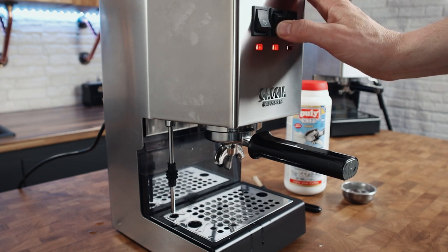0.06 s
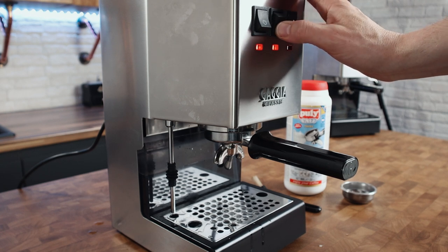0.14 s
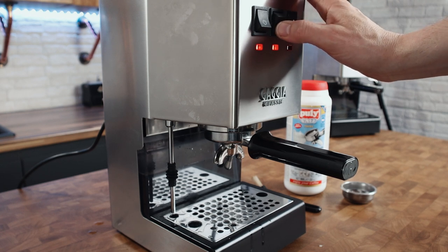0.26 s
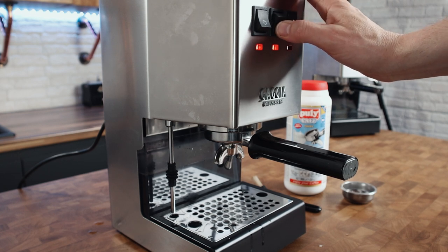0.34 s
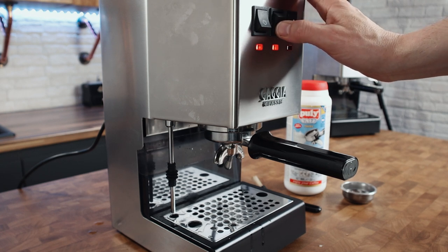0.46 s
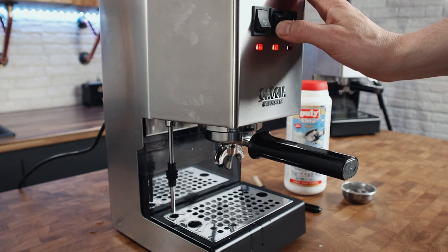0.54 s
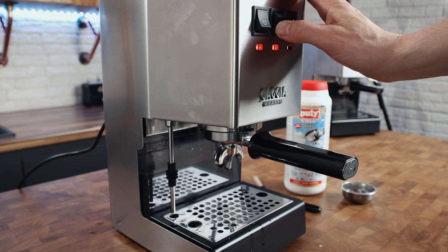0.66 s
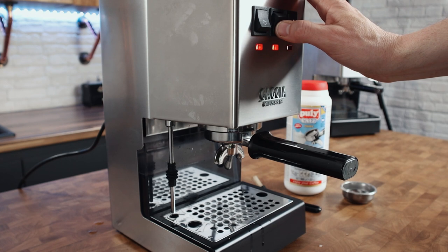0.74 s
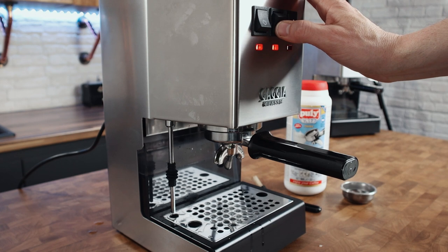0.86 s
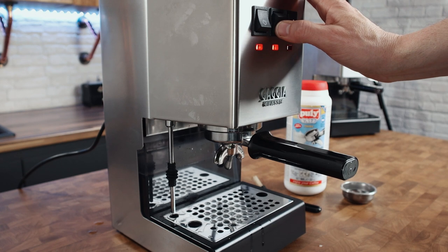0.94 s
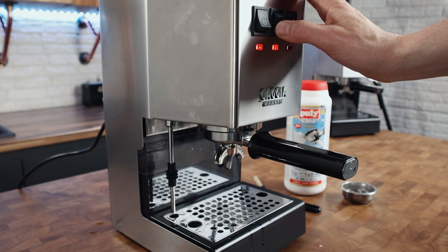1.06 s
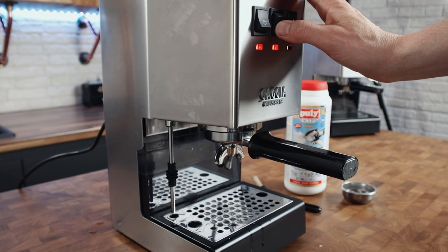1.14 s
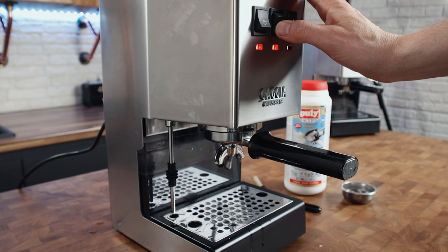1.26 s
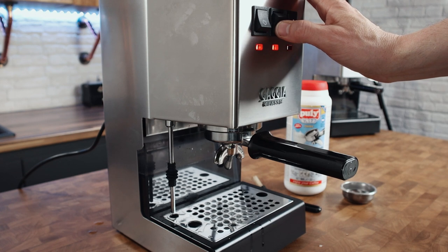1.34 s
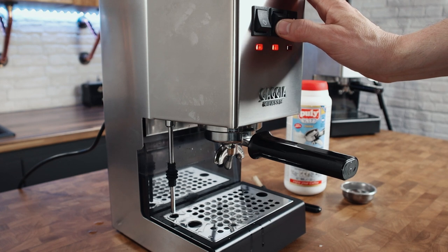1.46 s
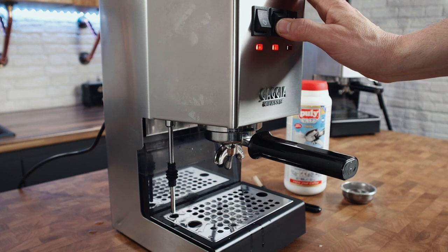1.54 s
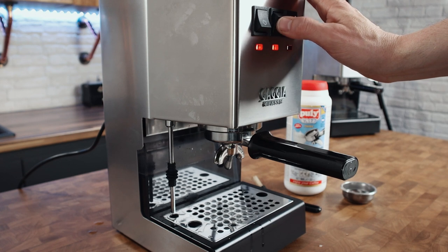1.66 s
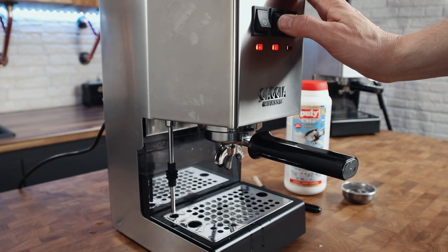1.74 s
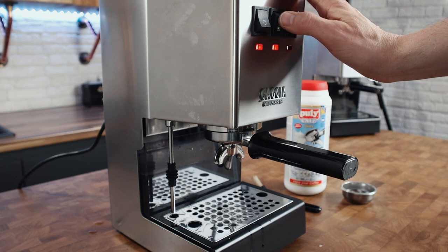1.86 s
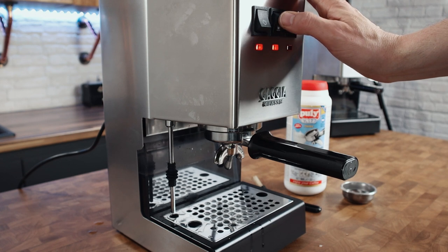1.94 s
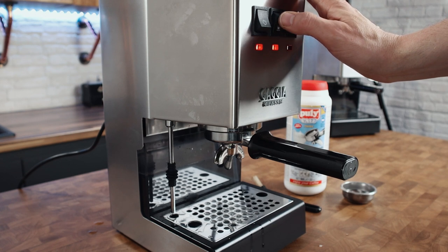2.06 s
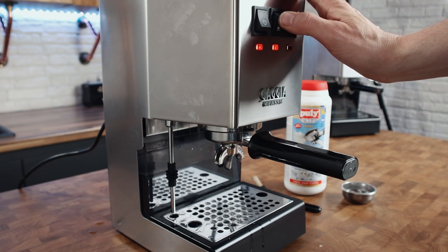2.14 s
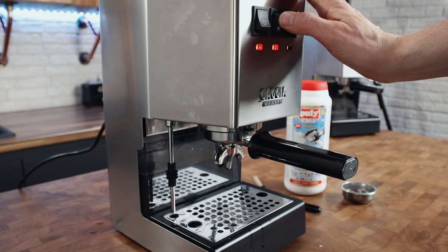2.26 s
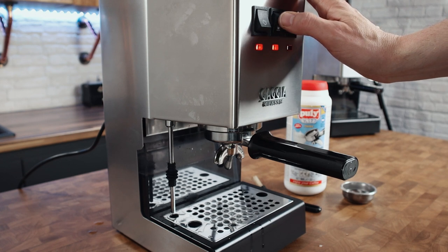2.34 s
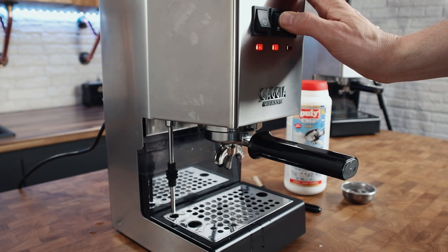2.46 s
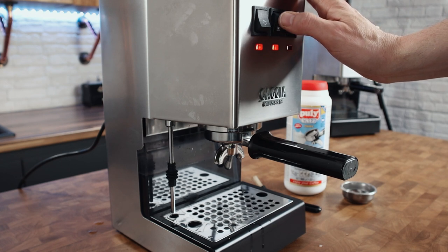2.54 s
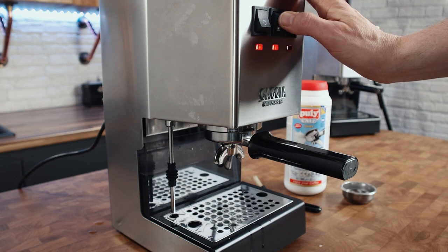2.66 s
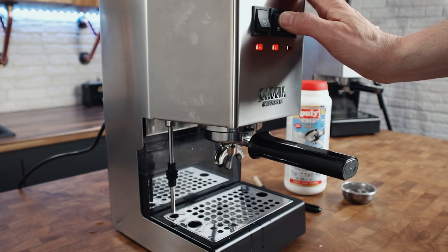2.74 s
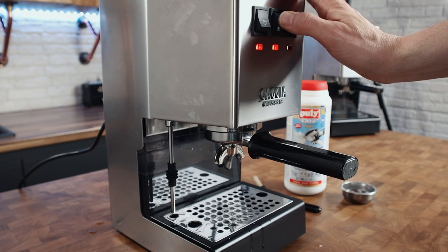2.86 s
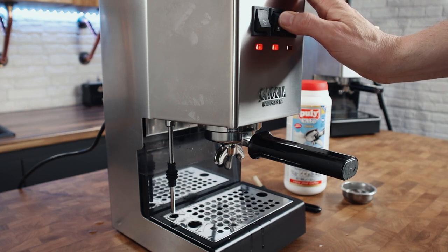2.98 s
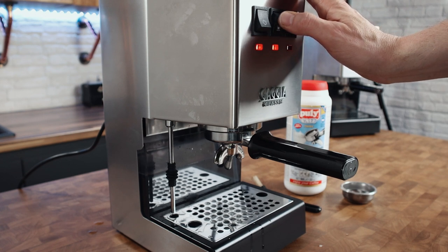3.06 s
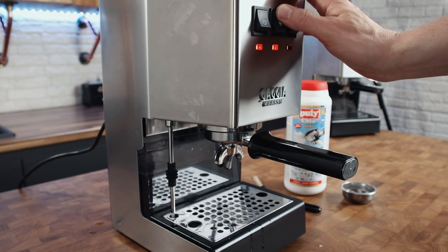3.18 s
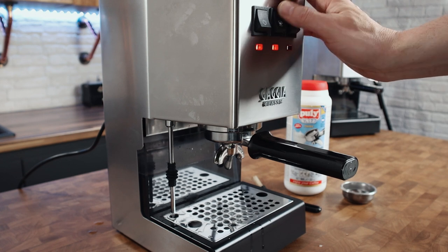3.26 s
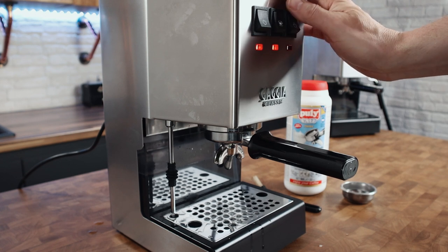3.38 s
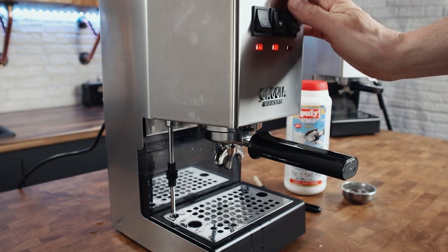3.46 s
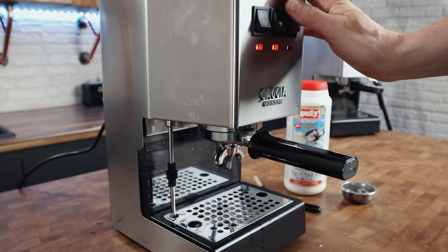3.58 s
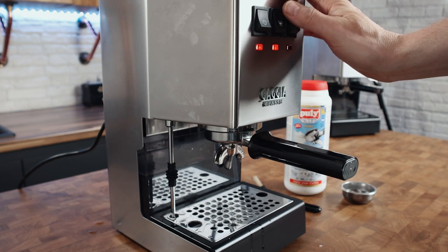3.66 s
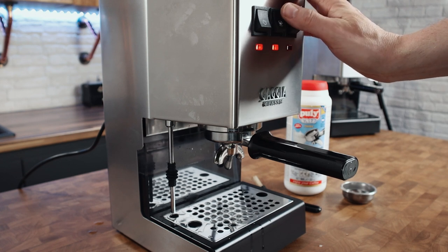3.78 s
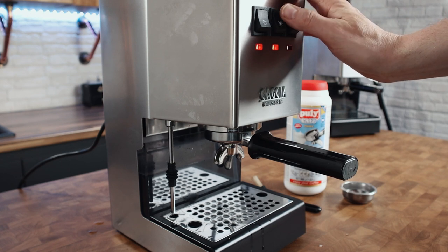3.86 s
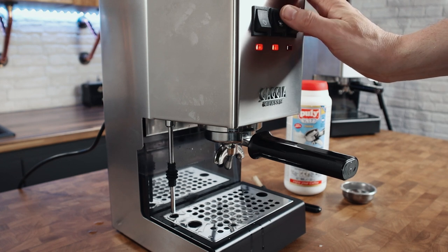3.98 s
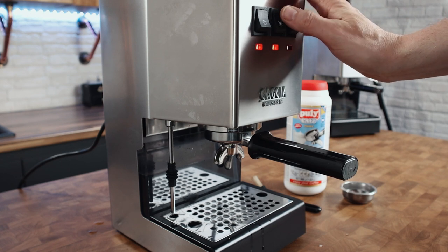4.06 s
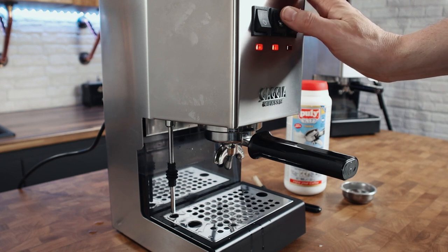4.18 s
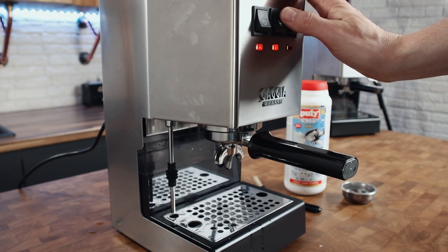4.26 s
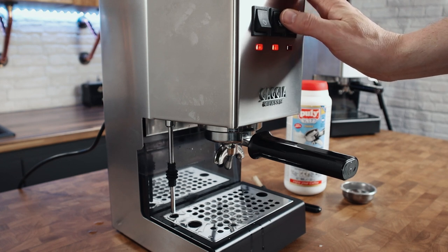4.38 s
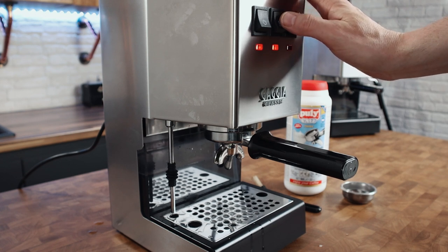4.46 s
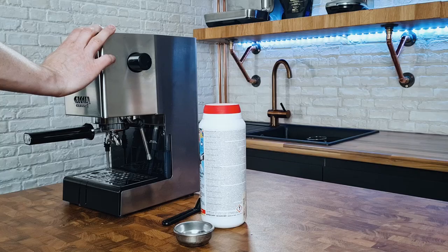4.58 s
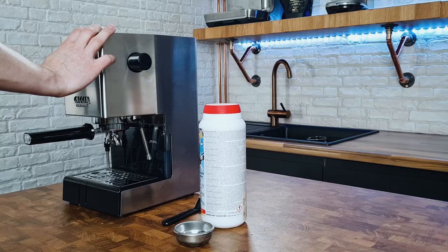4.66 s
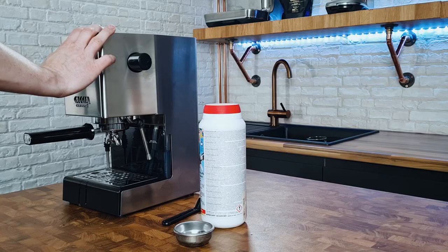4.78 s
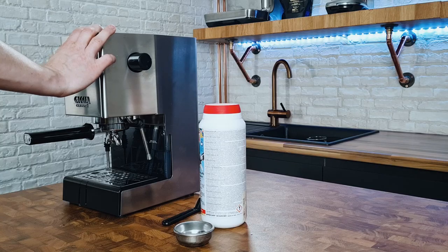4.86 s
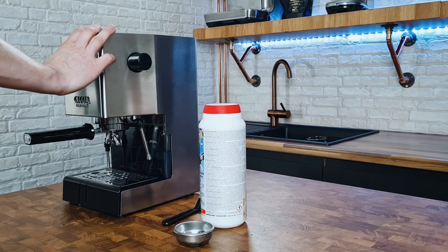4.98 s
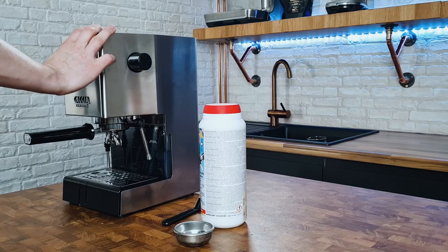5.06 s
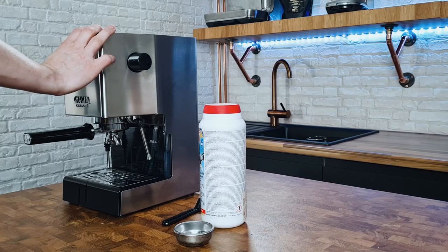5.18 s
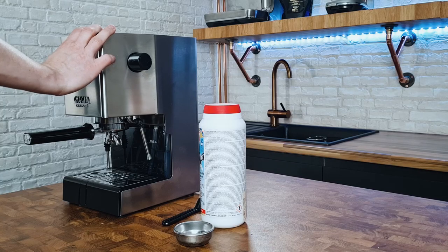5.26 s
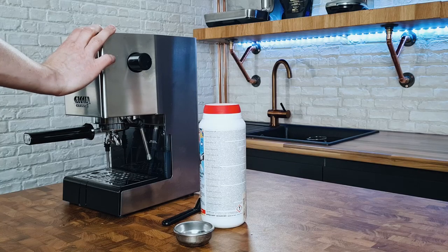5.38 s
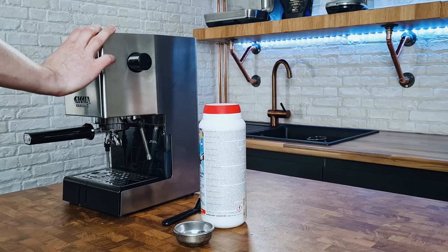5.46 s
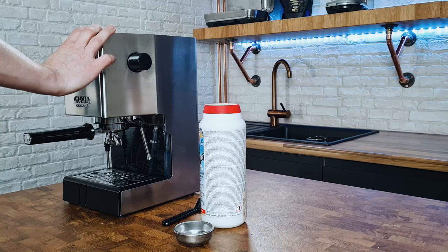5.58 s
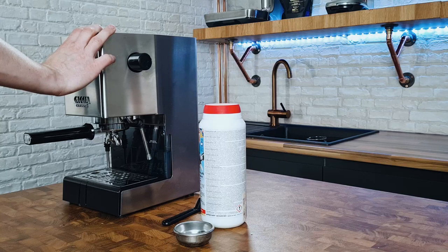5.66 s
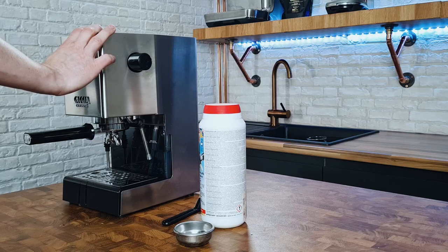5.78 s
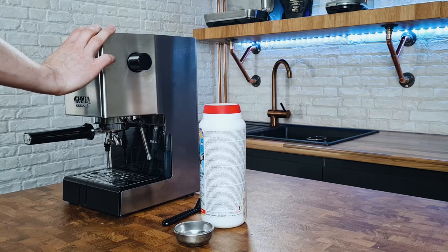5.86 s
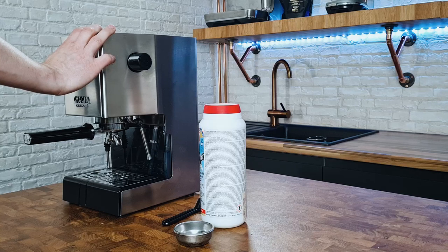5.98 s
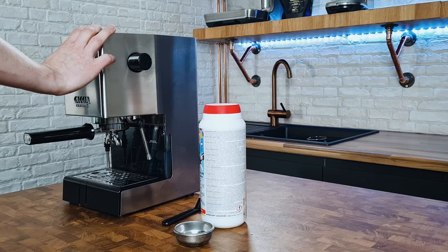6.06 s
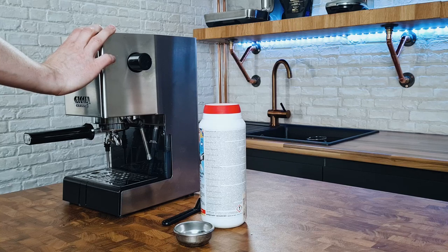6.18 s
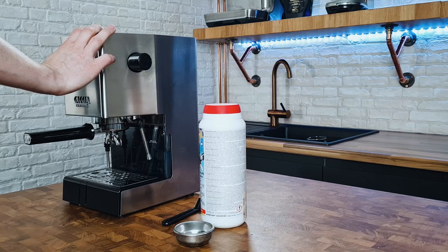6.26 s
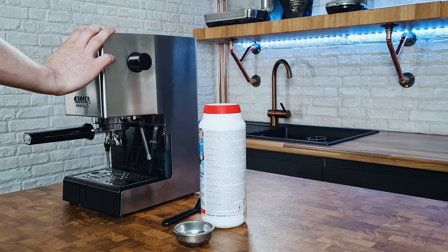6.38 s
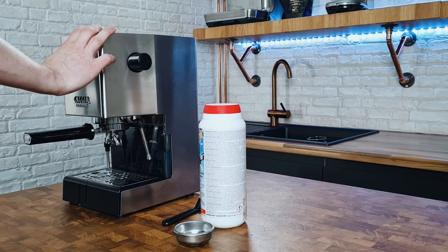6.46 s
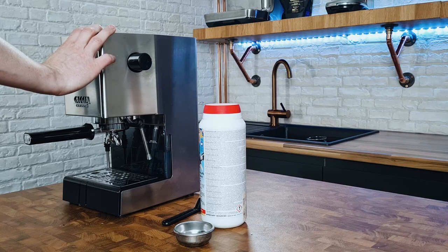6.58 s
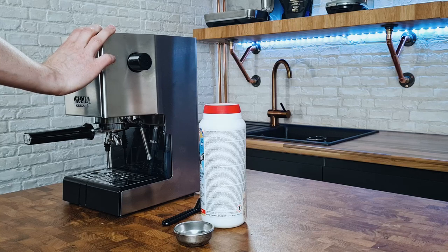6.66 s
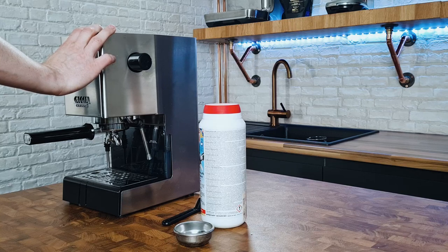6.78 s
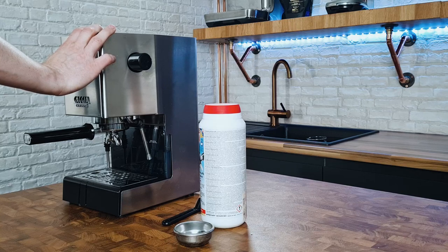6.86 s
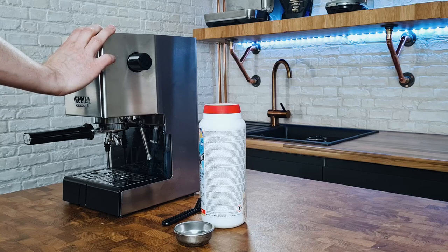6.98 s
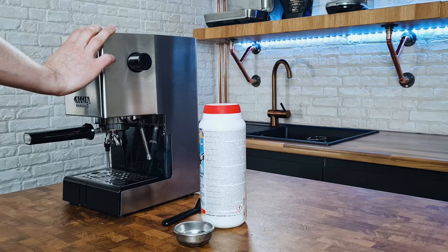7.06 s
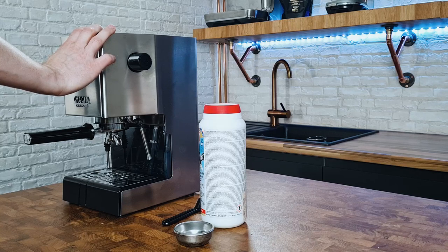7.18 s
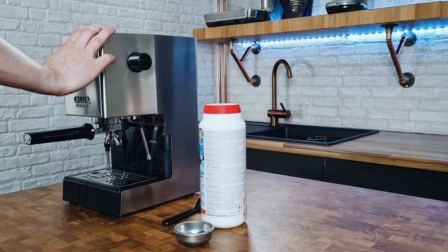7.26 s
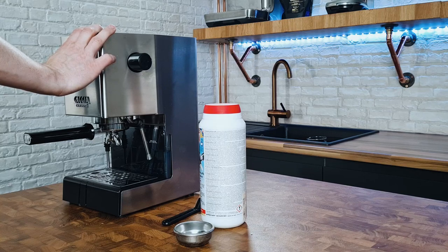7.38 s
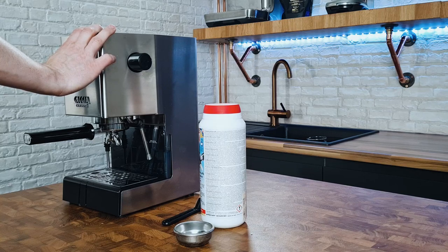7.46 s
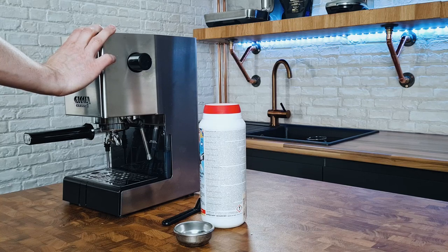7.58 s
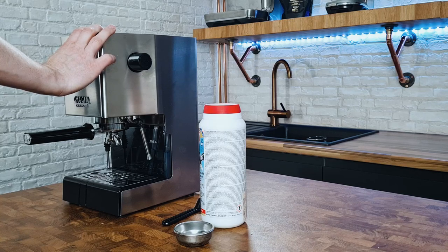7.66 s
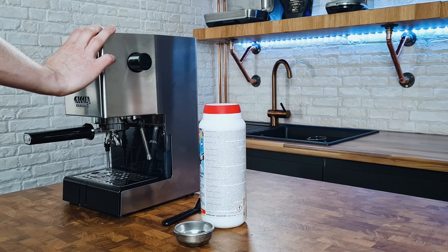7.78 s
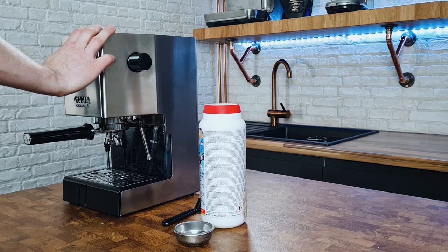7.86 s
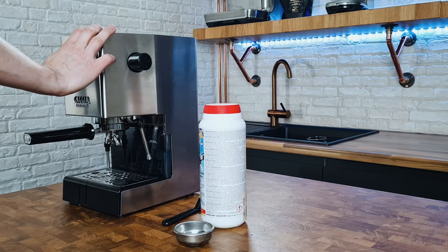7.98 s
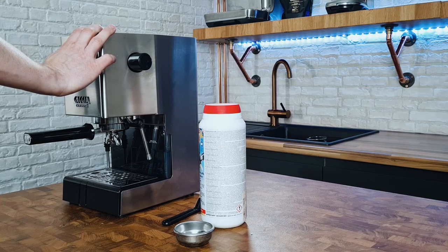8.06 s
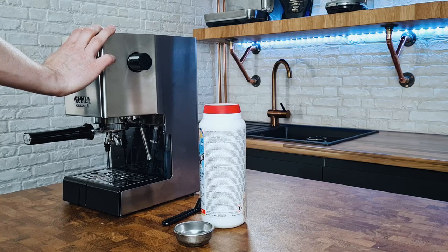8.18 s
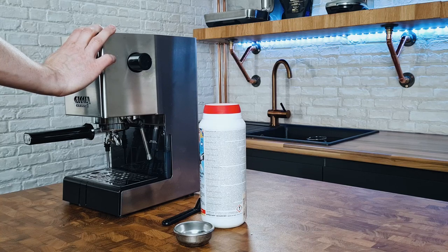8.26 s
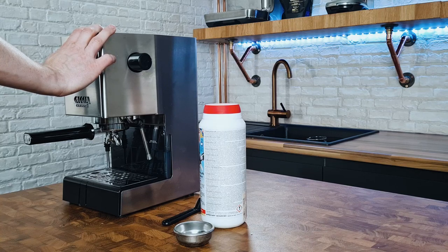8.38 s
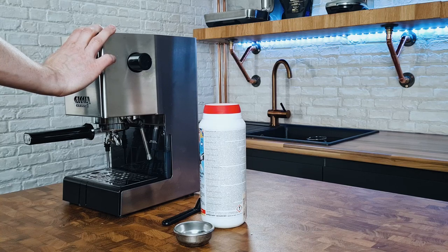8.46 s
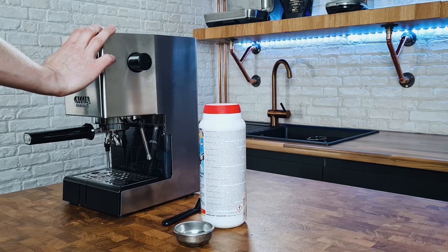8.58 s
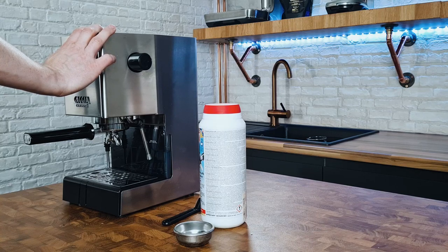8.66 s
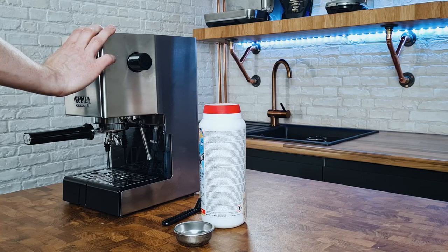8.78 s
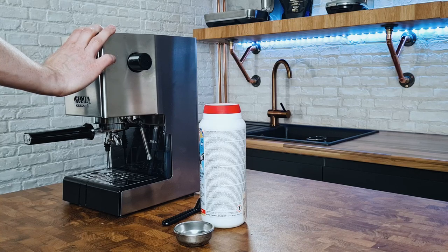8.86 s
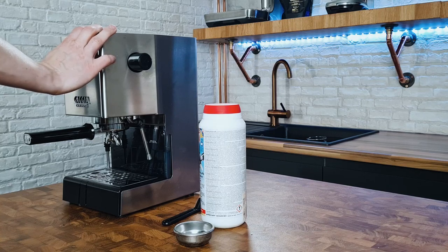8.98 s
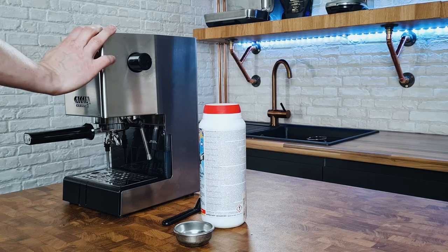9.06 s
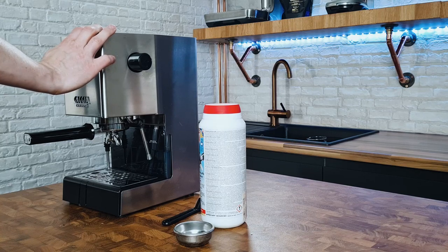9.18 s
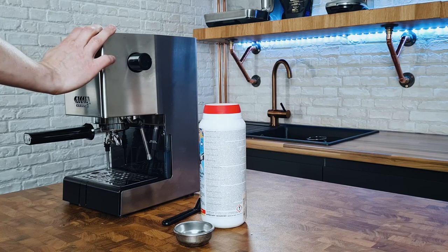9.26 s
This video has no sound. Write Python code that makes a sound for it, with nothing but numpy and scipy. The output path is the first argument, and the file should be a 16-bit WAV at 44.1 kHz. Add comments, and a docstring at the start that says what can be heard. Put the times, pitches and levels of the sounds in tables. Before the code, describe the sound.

An espresso machine pump buzzes and rattles with chattering valve squeals in two runs, each cut off by a loud metallic clack and short hiss.

```python
"""A humming, rattling pump is heard first, already at work: a steel espresso machine in a tiled kitchen, in mono.
The mains-driven plunger runs twice against a closed basket: tones at multiples of the mains rate make its hum and
buzz, noise shaped stroke by stroke its rattle, and gated resonant bursts near 1.6 kHz its sprung valve's chatter.
Switch and solenoid clack loudly at both stops and the second start, as blows on ringing panels with a noise tail.
Each stop vents a short hiss of coloured noise; a low room murmur lies under all."""
import sys
import numpy as np
from scipy import signal
from scipy.io import wavfile
from scipy.ndimage import uniform_filter1d

SR = 44100
rng = np.random.default_rng(int(sys.argv[2]) if len(sys.argv) > 2 else 0)


def file_out(sig):
    """Save sig as 16-bit WAV at sys.argv[1]."""
    # one column per channel
    cols = np.atleast_2d(sig).T
    # limit, then scale
    lim = np.clip(cols, -1, 1)
    pcm = np.round(lim * 32767).astype(np.int16)
    wavfile.write(sys.argv[1], SR, pcm)


def elevation(decibels):
    """Turn decibel levels (scalar or array-like) into linear amplitude ratios."""
    levels = np.asarray(decibels, float)
    return 10 ** (levels / 20)


N = 411012

MAINS_HZ, BREAK_S = 49.95, 4.0   # one plunger stroke per mains cycle; a time between the two runs
EDGES_HZ = 35 * 2 ** np.arange(0, 9.1, 1 / 3)   # third-octave band edges
# The two pump runs: start t/s, stop t/s
RUNS = [(0, 3.25), (4.93, 8.99)]
# Pump tones of each run, the first ten hum, the rest buzz: multiple of the stroke rate, relative level/dB
STROKE_TONES = [
    [(1, -24.5), (2, -4), (3, -13.5), (4, 1), (5, -6.5), (6, -3.5), (7, -2.5), (8, -6.5), (9, -5),
     (10, -18.5), (11, -11.5), (12, -8.5), (13, -11), (14, -11), (15, -14), (16, -6.5), (17, -13.5),
     (18, -11), (19, -5.5), (20, -9.5), (21, -7), (22, -9), (23, -6.5), (24, -7.5), (25, -6.5), (26, -4),
     (27, -14), (28, -25.5), (29, -24.5), (30, -5.5), (31, -6.5), (32, -3.5), (33, -10), (34, -13),
     (35, -5), (36, -7.5)],
    [(1, -18), (2, -2), (3, -20.5), (4, -5.5), (5, -14), (6, -0.5), (7, 1.5), (8, -5), (9, -13.5),
     (10, -22), (11, -1.5), (12, 4.5), (13, -1.5), (14, -9), (15, -9), (16, 1.5), (17, -1), (18, -4),
     (19, 3), (20, 4.5), (21, -29), (22, 2), (23, 7.5), (24, 8), (25, 7.5), (26, 9), (27, 3), (28, -12),
     (29, -9), (30, -39), (31, 6), (32, -35.5), (33, -38), (34, 7), (35, -6.5), (36, 2.5)],
]
# Where the plunger lands, each run: share of a mains cycle
STROKE_START = [.62, .86]
# Pump at work, each run: switched on t/s, settled buzz level/dB, buzz missing while the basket is empty/dB,
# rattle level/dB (4 dB is added in pump), treble lift/dB, treble change/(dB per s)
LOAD = [(-.15, -50, 16, -51, 4, 0.18), (4.93, -50.5, 23, -51, 3.8, -.5)]
FILL_S, BUZZ_FILL_S = 0.21, 0.3   # the basket fills and pressure builds
# an unloaded plunger rattles louder and brighter; the rattle sags slowly
LOOSE_DB, LOOSE_TREBLE_DB, RATTLE_SAG_DB_PER_S = 3, 4.5, 0.93
AIR_MISSING_DB, AIR_S = 7.0, 1.2   # the topmost fizz of the rattle grows in slowly
# Where the topmost fizz settles, each run: lift/dB
AIR_SETTLED_DB = [-0.5, 3.5]
# Hum over time: t/s, level/dB, lift near 200 Hz/dB, lift near 350 Hz/dB
HUM = [(0, -45, 4, -1), (.5, -49, -2.5, 1), (1.6, -49.5, -2.5, -0.5), (2.4, -49.5, 1, -1),
       (3.2, -48, 3.5, 0.5), (5.0, -48, 0, 0.5), (5.6, -50, -3.5, 1.5), (6.6, -52, -1.5, 4),
       (7.3, -51.5, -0.5, -4), (8.0, -50, 1.5, -3.5), (9.0, -49.5, 2.5, -5)]
# Rattle spectrum: f/Hz, relative density/(dB per Hz)
RATTLE = [(35, -23.5), (60, -28.5), (103, -5.5), (149, -9.5), (301, -1), (408, -6.5), (492, -12.5),
          (593, -7), (732, -14.5), (1170, -2.5), (1580, -7), (2200, -13), (2850, -16.5), (3400, -16),
          (3940, -13.5), (13300, -22), (16000, -47.5)]
# Casing resonances: f/Hz, width/Hz, relative level/dB
CASING = [(3160, 120, -10), (4020, 110, 6.5), (4667, 140, 3.5), (5520, 250, -12), (5850, 120, -10.5),
          (8840, 610, -4), (9300, 150, -1.5), (11850, 250, -4.5)]
# Water column as pressure builds: middle t/s after the lead, length/s, f/Hz, width/Hz, level/dB
SURGE = [(0.01, 0.21, 187, 160, -49), (0.12, 0.27, 207, 82, -53), (0.23, 0.3, 343, 23, -52),
         (0.21, 0.2, 580, 71, -54), (0.27, 0.18, 943, 86, -56), (0.16, 0.61, 554, 470, -54)]
# The same build-up opens both runs: lead t/s
SURGE_LEAD_S = [0, 5.08]
# Spells of valve chatter: start t/s, length/s, level/dB
SPELLS = [(0.455, 0.23, -45), (0.723, 0.35, -44), (1.117, 0.046, -45.5), (1.245, 0.16, -45.5),
          (1.475, .13, -45), (1.703, 0.075, -45), (1.815, 0.028, -43.5), (1.887, 0.086, -45),
          (2.055, 0.034, -46.5), (2.165, 0.035, -44), (2.234, 0.032, -45.5), (2.352, 0.13, -47.5),
          (2.623, 0.034, -46.5), (2.706, .04, -46), (2.782, 0.021, -46), (2.906, 0.079, -47.5),
          (3.04, 0.039, -48.5), (5.541, 0.36, -45.5), (5.948, .39, -46), (6.372, 0.065, -47.5),
          (6.474, 0.18, -45), (6.698, 0.18, -48.5), (6.945, 0.059, -47), (7.56, 0.22, -47),
          (7.869, .07, -47.5), (8.172, 0.04, -52), (8.26, 0.07, -47.5), (8.395, 0.038, -49.5),
          (8.667, 0.053, -48.5), (8.913, 0.045, -47.5)]
SPELL_ATTACK_S, SPELL_FADE_DB_PER_S, SPELL_FLUTTER_DB = 0.014, 249.5, 1
# Valve resonances: f/Hz, width/Hz, relative level/dB
VALVE = [(1505, 45, 6), (1580, 40, -2), (1640, 50, 0), (1755, 35, 7)]
# Five valve bursts in two strokes: relative level/dB
BURST_DB = [0, -4, -1, -8, -3]
# Room murmur spectrum: f/Hz, relative density/(dB per Hz)
ROOM = [(18, -53), (30, -23), (95, -8), (196, -15), (235, 4), (254, -17), (320, -29), (2310, -45),
        (4070, -54), (12000, -45), (14000, -55)]
# Soft room hum: f/Hz, width/Hz, level/dB
ROOM_HUM = [(95, 20, -64), (227.8, 8.1, -66.5)]
# a bass swell about the start of the second run
SWELL_PEAK_S, SWELL_DB, SWELL_RISE_DB_PER_S, SWELL_FALL_DB_PER_S = 4.97, -50, 45, 80
# Switch and solenoid: t/s, level/dB, tail treble lift/dB, tail bass lift/dB, tail t60 factor,
# crack relative level/dB, pitch factor
CLACKS = [(3.249, -6.5, -3, -1.5, 1.14, 4, 1.05), (3.428, -33, -14, 7, 0.89, 3, 1),
          (3.488, -38.5, -31, -12, 0.89, 6, 0.64), (4.885, -48.5, 4, -15, 0.74, -16, 0.88),
          (4.9055, -5, 5.5, 1.5, 1.06, -3.5, 1.01), (8.989, -6, -4, -2, 1.137, 1.5, 1.08)]
# Clack tail spectrum: f/Hz, relative density/(dB per Hz)
CLACK_COLOUR = [(88, -42.5), (150, -3.5), (328, -13.5), (414, -19), (601, -12.5), (759, -14.5), (871, -9.5),
                (1420, -14), (1830, -1), (3040, -7), (3620, -15.5), (12200, -21), (16000, -52.5)]
# Kitchen tail: f/Hz, t60/s
TAIL = [(200, 0.3), (530, 0.35), (1390, 0.33), (3680, 0.24), (9700, 0.22)]
# Steel panel modes: f/Hz, relative level/dB, t60/s
PANEL = [(1698.5, -24.5, 0.29), (1770, -28, 0.41), (2040, -30.5, 0.1695), (2097, -42, 0.28),
         (2150, -24, 0.19), (2330, -29, 0.48), (2600, -39.5, 0.34), (2930, -17.5, 0.078),
         (3450, -27, 0.077), (3630, -31.5, 0.25), (4200, -33.5, 0.37), (4850, -47, .18)]
# Pressure vents down the drain tube after each stop: start t/s, peak level/dB
VENTS = [(3.249, -50), (8.99, -53.5)]
VENT_RISE_S, VENT_FALL_DB_PER_S = 0.15, 115.5
# Vent spectrum: f/Hz, relative density/(dB per Hz)
VENT_COLOUR = [(1000, -8), (2500, 16.5), (4300, 7.5), (6000, 0), (9000, 0.5), (11000, -9.5), (14000, -3.5),
               (16000, -30.5)]


def rms_one(x):
    """Scale to rms 1."""
    return x / np.sqrt(np.mean(x ** 2) + 1e-20)


def in_time(rows):
    """Columns of a table as curves over all samples."""
    s, *columns = np.transpose(rows)
    return [np.interp(np.arange(N) / SR, s, column) for column in columns]


def at_hz(points, hz):
    """Read a spectrum on a log-frequency axis."""
    point_hz, value = np.array(points).T
    return np.interp(np.log(hz), np.log(point_hz), value)


def drift(rate_hz):
    """Slow chance with spread 1: noise through two equal low-pass poles, at a 40th of the sample rate."""
    r = np.exp(-80 * np.pi * rate_hz / SR)
    slow = signal.lfilter([1], [1, -2 * r, r * r], rng.standard_normal(N // 40 + 2002))[2000:]
    return np.interp(np.arange(N) / 40, np.arange(len(slow)), rms_one(slow))


def resonance(x, hz, width_hz):
    """Two-pole resonance with gain 1 on top."""
    r = np.exp(-np.pi * width_hz / SR)
    zeros = np.array([1, 0, -1]) * (1 - r * r) / 2
    return signal.lfilter(zeros, [1, -2 * r * np.cos(2 * np.pi * hz / SR), r * r], x)


def band_pass(x, low_hz, high_hz):
    """Second-order Butterworth band-pass."""
    return signal.sosfilt(signal.butter(2, [low_hz, high_hz], "band", fs=SR, output="sos"), x)


def bands(x):
    """Third-octave bands with their centres; neighbours take unrelated rows of x."""
    for k, (low, high) in enumerate(zip(EDGES_HZ, EDGES_HZ[1:])):
        yield np.sqrt(low * high), band_pass(x[k % 2], low, high)


def running(k):
    """1 while run k lasts, with short ramps."""
    t, (start, stop) = np.arange(N) / SR, RUNS[k]
    return np.clip((t - start + 0.02) / 0.017, 0, 1) * np.clip((stop + 0.027 - t) / 0.023, 0, 1)


def load(k):
    """Buzz, rattle, treble lift and topmost fizz (dB) of run k, as set for a basket filling after switch-on."""
    on_s, buzz_db, missing_db, rattle_db, treble_db, treble_db_per_s = LOAD[k]
    since = np.maximum(np.arange(N) / SR - on_s, 0)
    empty = np.exp(-(since / FILL_S) ** 2 / 2)
    buzz = buzz_db - missing_db * np.exp(-(since / BUZZ_FILL_S) ** 2 / 2)
    rattling = rattle_db + LOOSE_DB * empty - RATTLE_SAG_DB_PER_S * since
    treble = treble_db + LOOSE_TREBLE_DB * empty + treble_db_per_s * since
    air = AIR_SETTLED_DB[k] - AIR_MISSING_DB * np.exp(-since / AIR_S)
    return buzz, rattling, treble, air


def stroke_tones(orders, start, waver_db, waver_rad, spread_rad):
    """Multiples of the stroke rate, each with its own scattered, slowly wavering phase and wavering level."""
    turn = 2 * np.pi * (MAINS_HZ * np.arange(N) / SR - start)
    out = 0
    for m, db in orders:
        level = elevation(db + waver_db * min(m / 6, 1) * drift(9.0))   # the lowest waver less
        phase = spread_rad * rng.standard_normal() + waver_rad * drift(5.0)
        out = out + level * np.cos(m * turn + phase)
    return rms_one(out)


def rattle(cycle, top_db, air_db):
    """Each landing shakes the casing: one part repeats by stroke, loose parts add grain; it dies through the stroke."""
    grain = elevation(0.83 * np.minimum(rng.exponential(1, (2, N)), 5))
    blow = elevation(0.41 * rng.standard_normal(int(cycle[-1]) + 3))[cycle.astype(int) + 1]
    period = round(SR / MAINS_HZ)
    fall_db = -14.0 * np.clip(np.arange(period) / period - 0.25, 0, 1)
    same = rms_one(rng.standard_normal((2, period)) * elevation(fall_db))
    repeated = same[:, (cycle % 1 * period).astype(int)]
    white = rms_one(rng.standard_normal((2, N)) * grain) + elevation(-2.0) * repeated
    out = 0
    for hz, band in bands(white):
        depth_db = 4.5 * np.clip(np.log2(hz / 300) / 3.0, 0, 1)   # the treble dies further
        die_db = depth_db * np.clip((cycle % 1 - 0.25) / 1.3, 0, 1)
        bright_db = top_db * np.clip(np.log2(hz / 4000), 0, 1) + air_db * np.clip(2 * np.log2(hz / 10000), 0, 1)
        out = out + band * elevation(at_hz(RATTLE, hz) + bright_db - die_db + 0.97 * drift(11.0))
    out = out * blow
    ringing = sum(elevation(db + 1.2 * drift(6.0)) * resonance(out, hz, width) for hz, width, db in CASING)
    return rms_one(out + ringing)


def surge(shaking, cycle):
    """As the basket fills, strokes and rattle excite resonances of the water column, each rising and falling."""
    t, out = np.arange(N) / SR, 0
    landings = np.diff(np.floor(cycle), prepend=0) > 0
    drive = shaking + elevation(3.0) * rms_one(landings)
    for s, length, hz, width, db in SURGE:
        shape = sum(np.cos(np.pi * np.clip((t - lead - s) / length, -0.5, 0.5)) for lead in SURGE_LEAD_S)
        out = out + elevation(db) * shape * rms_one(resonance(resonance(drive, hz, width), hz, width))
    return out


def spells():
    """Gain of the chatter: each spell sets in fast, holds with a flutter and fades."""
    t, out = np.arange(N) / SR, np.zeros(N)
    for s, length, db in SPELLS:
        fade_db = SPELL_FADE_DB_PER_S * np.maximum(t - s - length, 0)
        out = np.maximum(out, np.clip((t - s) / SPELL_ATTACK_S + 0.5, 0, 1) * elevation(db - fade_db))
    return out * elevation(SPELL_FLUTTER_DB * drift(19.0))


def chatter(cycle):
    """The valve squeals in five uneven bursts per two strokes; each swells and is cut short as the ball seats."""
    beat = 2.5 * cycle + 5.45 + 0.13 * drift(4.0)   # the bursts slip a little against the strokes
    which, part = beat.astype(int), beat % 1
    luck = rng.standard_normal((which.max() + 1, 3))[which]   # chance pitch, phase and level of each burst
    since = (np.arange(N) - np.searchsorted(which, which)) / SR
    tone = np.sin(2 * np.pi * 1630 * (1 + 0.012 * luck[:, 0]) * since + 0.6 * luck[:, 1])
    swell = np.clip(part / 0.1, 0, 1) * (0.2 + part ** 2.2) * np.clip((1 - part) / 0.2, 0, 1)
    bursts = tone * swell * elevation(np.array(BURST_DB)[which % 5] + 1.8 * luck[:, 2])
    bursts = resonance(bursts, 1640, 500)   # the housing passes only a band
    return rms_one(bursts + sum(elevation(db) * resonance(bursts, hz, width) for hz, width, db in VALVE))


def pump():
    """The plunger lands once per mains cycle: hum, buzz, rattle, surge and chatter of both runs."""
    t = np.arange(N) / SR
    first = t < BREAK_S
    cycle = MAINS_HZ * t - np.where(first, *STROKE_START)
    curves = [load(k) for k in range(len(RUNS))]
    hum_db, low_db, high_db = in_time(HUM)
    treble_db = np.where(first, curves[0][2], curves[1][2])
    air_db = np.where(first, curves[0][3], curves[1][3])
    shaking = rattle(cycle, treble_db, air_db)
    squeal = spells() * chatter(cycle)
    growl = rms_one(resonance(resonance(shaking, 1240, 300), 1240, 300))   # casing rings with the rattle
    out = surge(shaking, cycle) * (running(0) + running(1))
    for k, (buzz_db, rattle_db, *_) in enumerate(curves):
        tones, start = STROKE_TONES[k], STROKE_START[k]
        hum = elevation(hum_db) * stroke_tones(tones[:10], start + 0.18, waver_db=2.5, waver_rad=0.3, spread_rad=1.5)
        low = (elevation(low_db) - 1) * resonance(hum, 200, 60)
        hum = hum + low + (elevation(high_db) - 1) * resonance(hum, 350, 60)
        buzz = stroke_tones(tones[10:], start + 0.19, waver_db=1.5, waver_rad=0.12, spread_rad=1.45)
        buzz = elevation(buzz_db) * buzz + elevation(buzz_db - 16.5) * growl
        out = out + running(k) * (hum + buzz + elevation(rattle_db + 4.0) * shaking + squeal)
    return out


def room_tone():
    """Smooth low murmur of shaped noise with two soft hum lines, a faint hiss, and a bass swell."""
    murmur = sum(band * elevation(at_hz(ROOM, hz)) for hz, band in bands(rng.standard_normal((2, N))))
    hum = sum(elevation(db) * rms_one(resonance(rng.standard_normal(N), hz, width)) for hz, width, db in ROOM_HUM)
    bass = signal.lfilter([1], [1, -0.97], band_pass(rng.standard_normal(N), 70, 600))
    late = np.arange(N) / SR - SWELL_PEAK_S
    swell_db = SWELL_DB + np.minimum(SWELL_RISE_DB_PER_S * late, -SWELL_FALL_DB_PER_S * late)
    return elevation(-62.0) * rms_one(murmur) + hum + elevation(swell_db) * rms_one(bass)


def clack_tail(t, treble_db, bass_db, longer, pitch):
    """The kitchen answers a clack with noise dying band by band, scaled to rms 1 over its first 20 ms."""
    tail = 0
    for hz, band in bands(rng.standard_normal((2, len(t)))):
        lift_db = at_hz([(500, bass_db), (1500, 0.0068), (4000, 0.0057), (9000, treble_db)], hz)
        swell = 1 - np.exp(-t * hz / 6.0)   # lows take longer to build
        fall_db = 60 * t / (longer * at_hz(TAIL, hz))
        tail = tail + band * swell * elevation(at_hz(CLACK_COLOUR, hz / pitch) + lift_db - fall_db)
    return tail / np.sqrt(np.mean(tail[:SR // 50] ** 2))


def clack_body(t, crack_db, pitch):
    """A crack and three quick rebounds ring the steel panels."""
    blows = np.zeros(len(t))
    blows[[round(s * SR) for s in (0, 0.0021, 0.0052, 0.012)]] = elevation([0, -3, -7, -9])
    rings = 0
    for hz, db, t60 in PANEL:
        level = elevation(db + 2.5 * rng.standard_normal() - 60 * t / t60)
        rings = rings + level * np.sin(2 * np.pi * hz * pitch * t)
    snap = -(np.sin(2 * np.pi * 2400 * pitch * t) + 0.4 * np.sin(2 * np.pi * 4300 * pitch * t))
    snap = snap * np.clip(t / 0.0003, 0, 1) * elevation(-60 * t / 0.0045)
    return signal.fftconvolve(blows, elevation(crack_db) * snap + 0.3 * rings)[:len(t)]


def clacks():
    """Switch and solenoid: struck steel panels and the kitchen's tail, with the bass cut below 220 Hz."""
    out, size = np.zeros(N + SR), SR
    t = np.arange(size) / SR
    for s, level_db, treble_db, bass_db, longer, crack_db, pitch in CLACKS:
        at = round((s + 0.001) * SR)
        out[at - 50:at - 50 + size] += elevation(level_db - 14.0) * clack_tail(t, treble_db, bass_db, longer, pitch)
        out[at:at + size] += elevation(level_db) * clack_body(t, crack_db, pitch)
    return signal.sosfilt(signal.butter(2, 220, "high", fs=SR, output="sos"), out[:N])


def vent():
    """Spray hissing out of the drain tube, slightly spitting; it swells fast and dies away."""
    t, hiss, shape = np.arange(N) / SR, 0, 0
    for hz, band in bands(rng.standard_normal((2, N))):
        if hz > 700:
            hiss = hiss + band * elevation(at_hz(VENT_COLOUR, hz) + 1.7 * drift(25.0))
    for s, db in VENTS:
        fall_db = VENT_FALL_DB_PER_S * np.maximum(t - s - VENT_RISE_S, 0)
        shape = shape + np.clip((t - s) / VENT_RISE_S, 0, 1) ** 2 * elevation(db - fall_db)
    return shape * rms_one(hiss)


def scene():
    """All sources on one microphone."""
    return (pump() + room_tone() + clacks() + vent())[None]


def band_limit(x):
    """A steep low-pass at the top of the band."""
    return signal.sosfilt(signal.butter(12, 16610, fs=SR, output="sos"), x)


def record(dry):
    """A downward expander shortens quiet tails: half a dB less per dB below -53 dB, at most 8 dB."""
    level_db = 10 * np.log10(uniform_filter1d(dry ** 2, size=1500, axis=1) + 1e-12)
    cut_db = np.clip(0.5 * (level_db + 53.0), -8.0, 0)
    return band_limit(dry * elevation(cut_db))


dry = scene()
out = record(dry)
file_out(out)
```